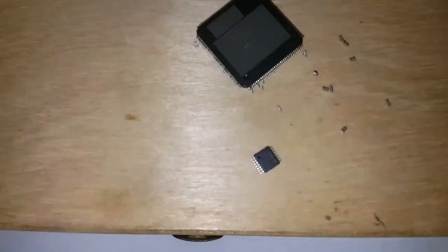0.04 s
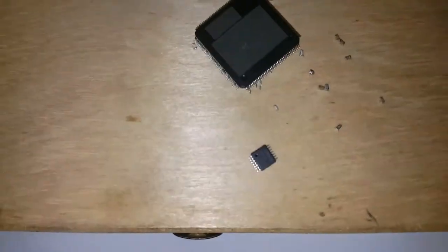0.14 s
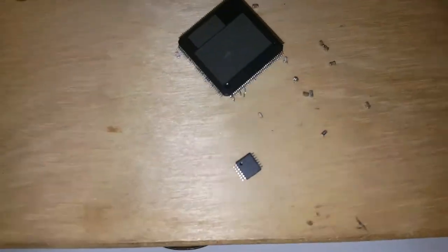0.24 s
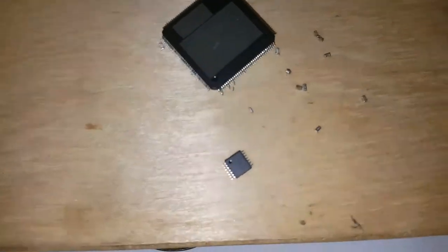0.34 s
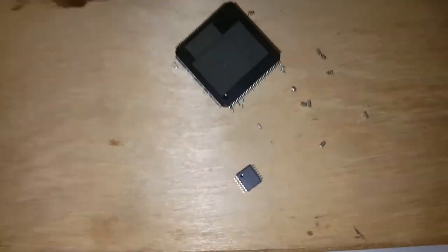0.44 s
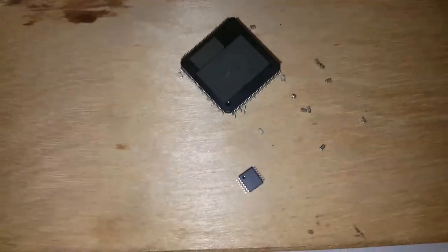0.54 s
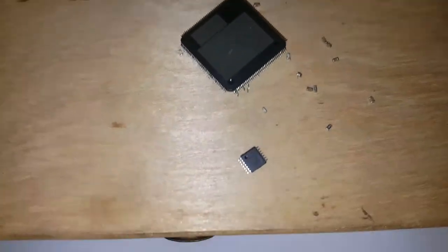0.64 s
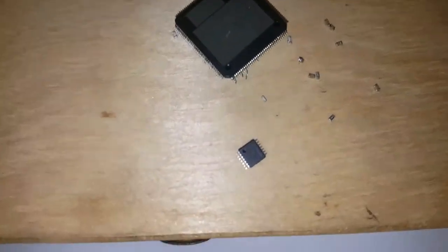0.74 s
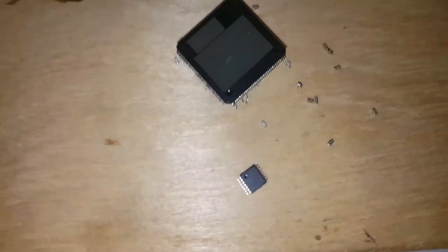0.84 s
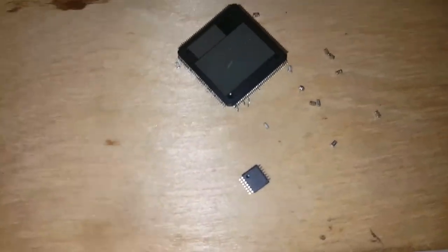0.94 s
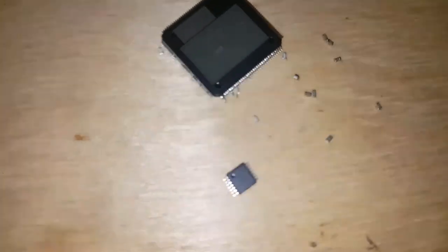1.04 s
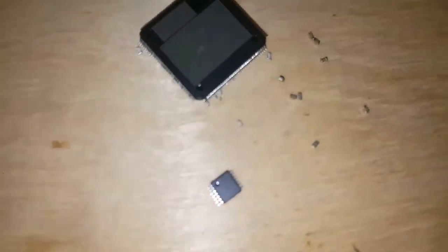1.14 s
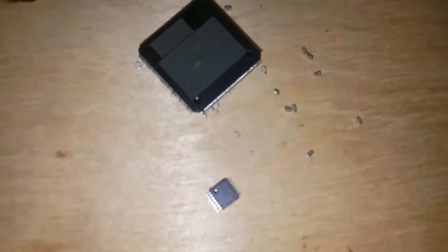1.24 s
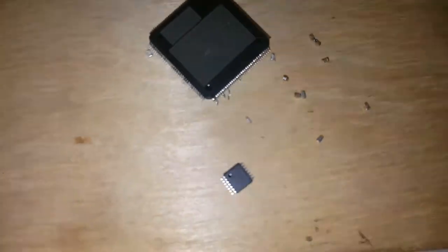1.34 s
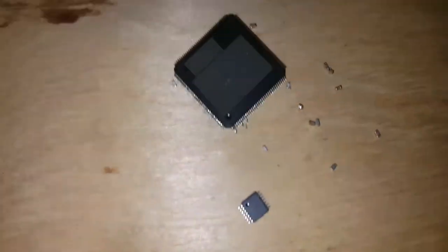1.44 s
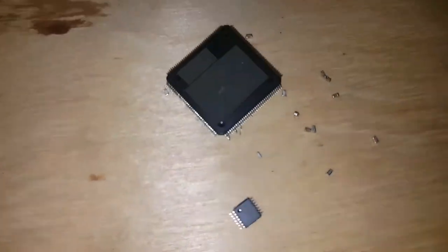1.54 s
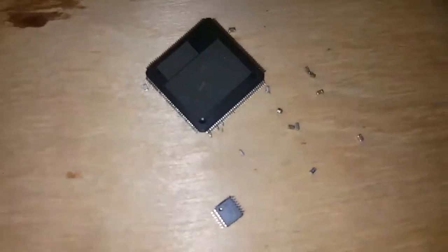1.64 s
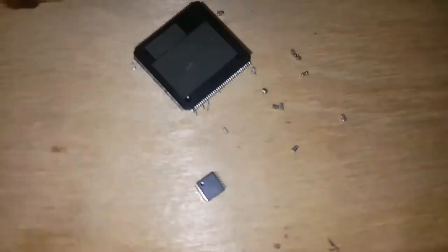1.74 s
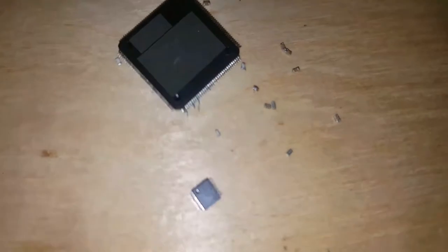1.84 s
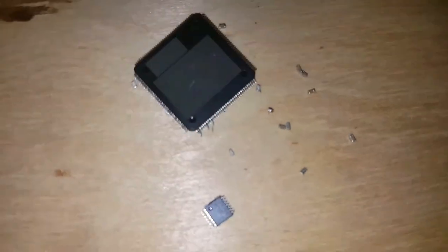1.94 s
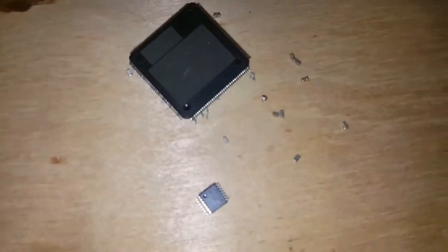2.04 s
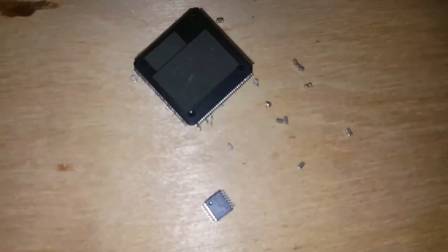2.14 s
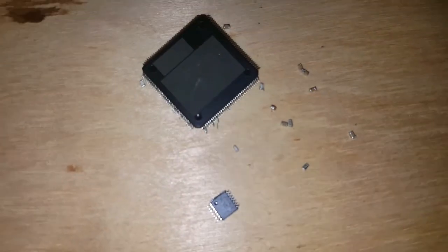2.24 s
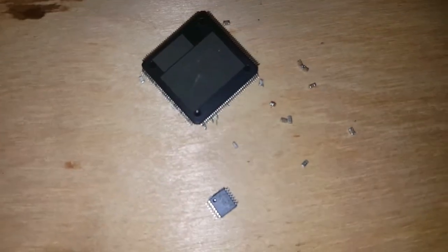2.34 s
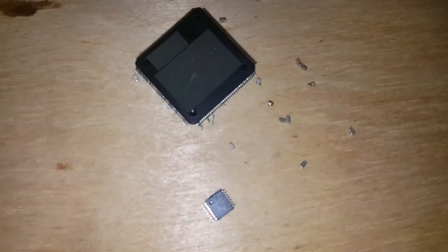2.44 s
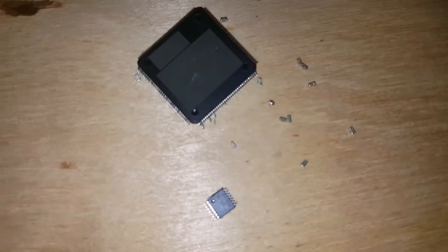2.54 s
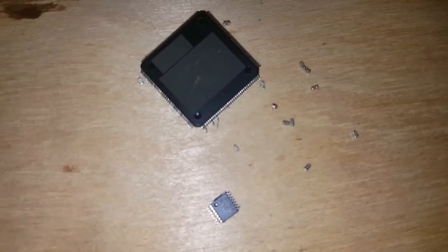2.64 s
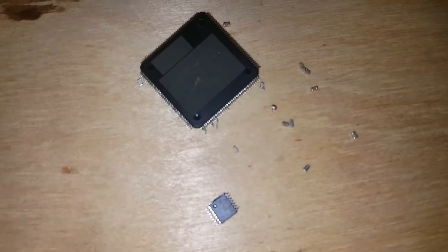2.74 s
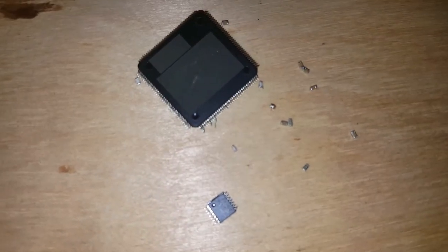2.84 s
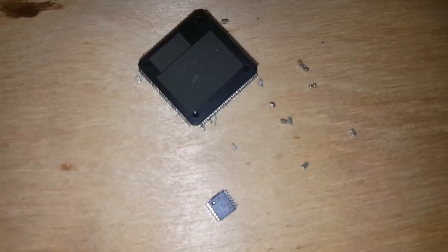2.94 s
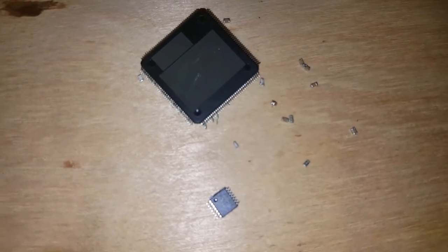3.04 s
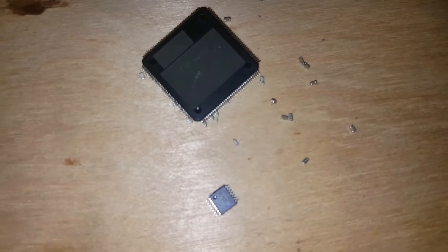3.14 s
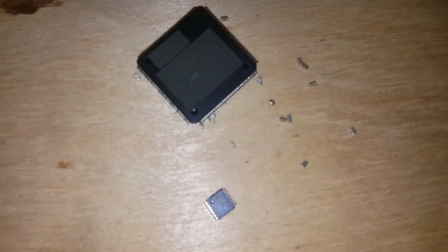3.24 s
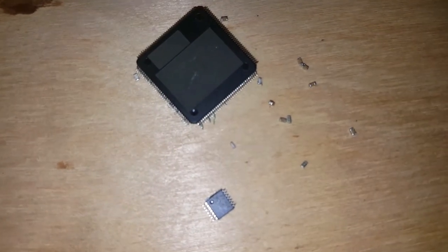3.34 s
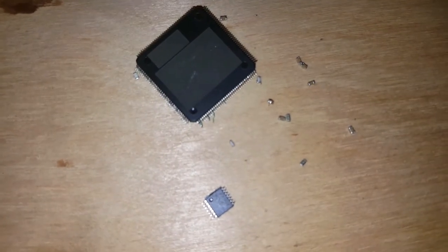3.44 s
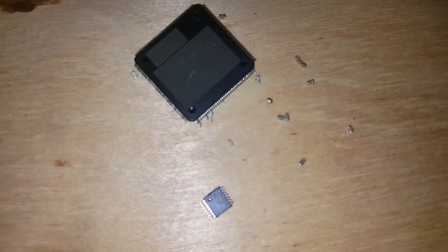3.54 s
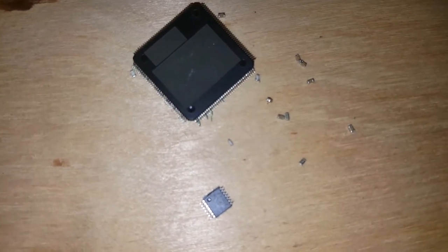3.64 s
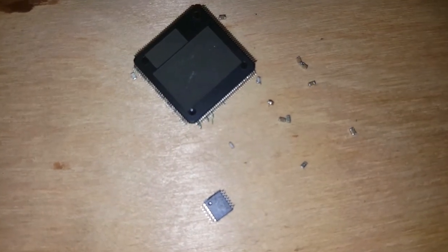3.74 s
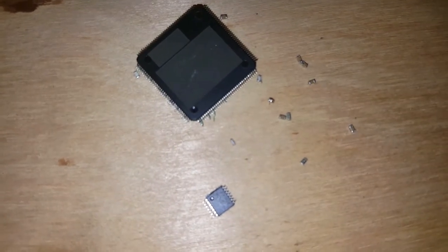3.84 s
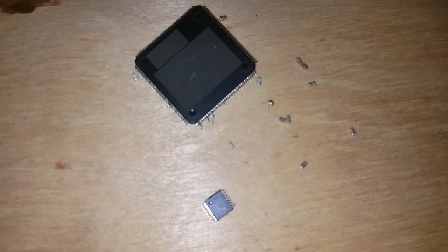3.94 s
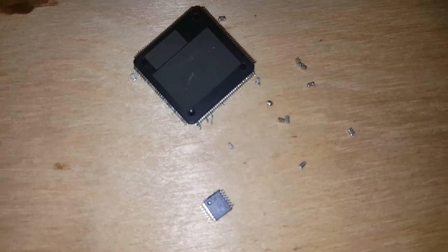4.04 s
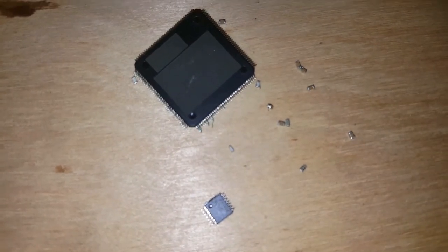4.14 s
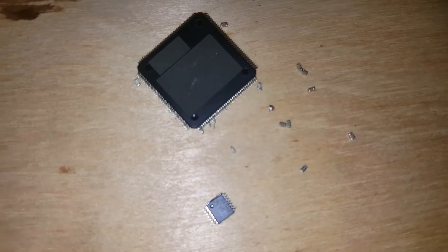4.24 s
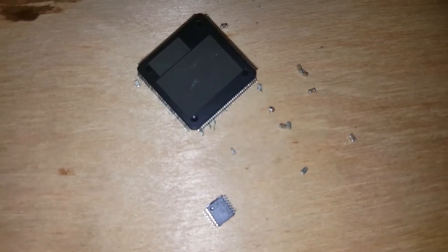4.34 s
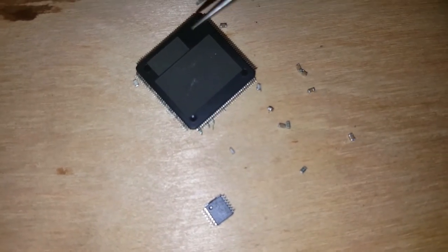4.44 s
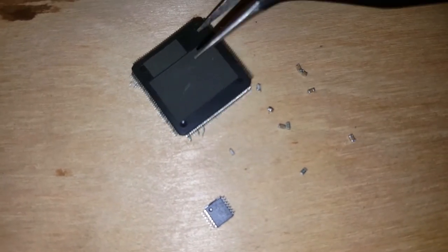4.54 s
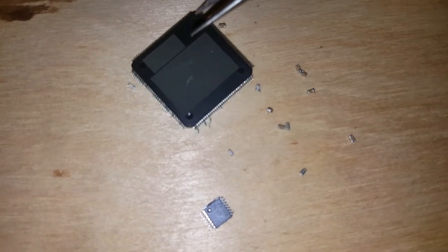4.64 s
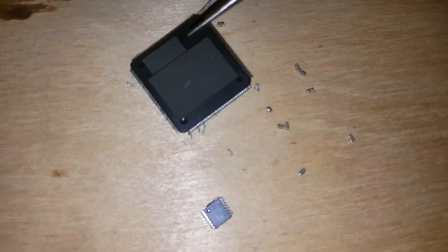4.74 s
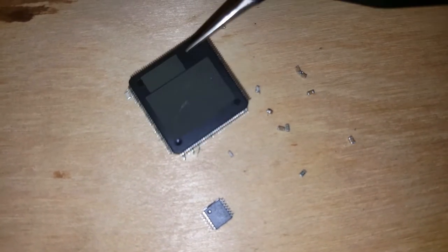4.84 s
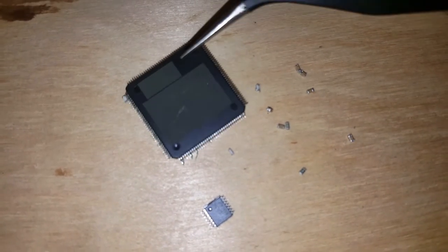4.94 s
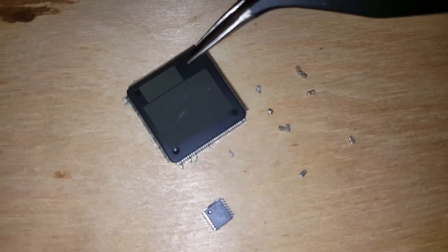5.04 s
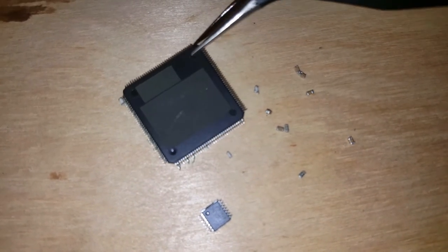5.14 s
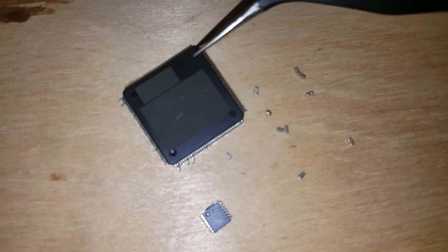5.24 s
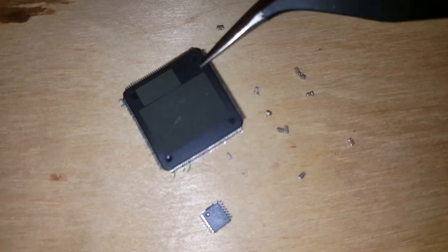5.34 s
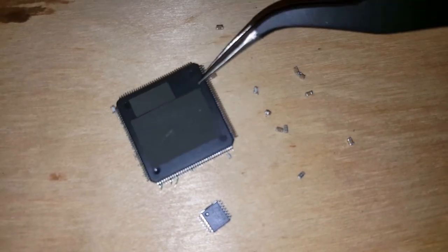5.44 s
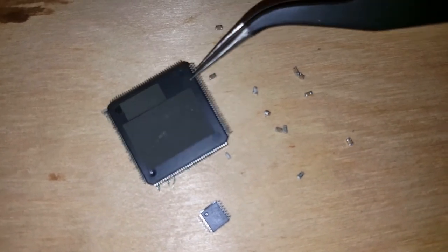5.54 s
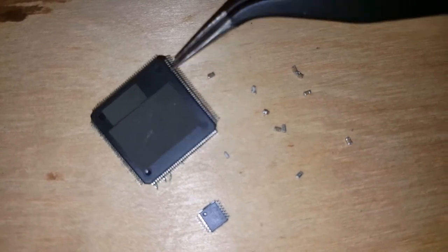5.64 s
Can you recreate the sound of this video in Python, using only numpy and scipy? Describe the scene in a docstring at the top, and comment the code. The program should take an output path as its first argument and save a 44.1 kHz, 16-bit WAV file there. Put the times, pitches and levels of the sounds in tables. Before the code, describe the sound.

Quiet small room, close stereo microphone on a hand-held camera. Fingers tap, rub and bump the camera body with low rumble for two seconds. Steel tweezers rattle brightly at 2.5 seconds, a sharp tap hits wood at 3.3, faint tip slides follow, then a cluster of clicks and gritty scrapes as a flat chip is dragged over the board.

```python
"""A quiet room with a wooden board: fingers tap and shift on a hand-held camera, then steel tweezers close by
are picked up with a rattle, tap the board, slide over it and drag a flat chip across the grain.
Taps are short bursts of noise plus fading tones. Rattle, slides and drags are uneven noise, shaped by
tone colours and by the resonances of steel, chip and board. The hand makes rumble, rubs and soft bumps.
Room tone and microphone hiss lie under it all; taps, rattle, slides and drags also get a short room tail."""
import sys
import numpy as np
from scipy import signal
from scipy.fft import rfft, irfft, next_fast_len
from scipy.io import wavfile
from scipy.ndimage import map_coordinates

SR = 44100
rng = np.random.default_rng(int(sys.argv[2]) if len(sys.argv) > 2 else 0)


def pcm_store(signal):
    """Save signal as 16-bit PCM."""
    levels = np.round(np.clip(np.atleast_2d(signal), -1, 1) * 32767)
    wavfile.write(sys.argv[1], SR, levels.astype(np.int16).T)


N = 251370

# Levels in the tables are relative: the functions below add their own trims.


def amp(db):
    """Decibels to gain."""
    return 10 ** (np.asarray(db) / 20)


def unit(x):
    """Scaled to rms 1."""
    return x / np.sqrt(np.mean(x ** 2) + 1e-20)


def sides(db):
    """Left and right gains for a level difference; positive is louder on the left."""
    return amp(np.array([db / 2, -db / 2]).reshape(2, -1))


def along(points):
    """(Hz, value) points joined on a log axis, as a function of frequency."""
    f, v = np.transpose(points)
    return lambda hz: np.interp(np.log(hz + 1), np.log(f + 1), v)


def colour(points):
    """Tone colour: gain at each frequency from (Hz, dB) points."""
    return lambda hz: amp(along(points)(hz))


def resonances(modes):
    """Sum of ringing (Hz, width Hz, dB) modes, every second one with its sign flipped."""
    def response(f):
        total = 0
        for k, (centre, width, db) in enumerate(modes):
            damping = 1j * f * width
            total = total + (-1) ** k * amp(db) * damping / (centre ** 2 - f ** 2 + damping)
        return total
    return response


def twice(modes):
    """Resonances applied twice, which leaves dark valleys between them."""
    once = resonances([(hz, 1.5 * width, db / 2) for hz, width, db in modes])
    return lambda f: once(f) ** 2


def filtered(x, response):
    """x shaped by a response of frequency."""
    m = next_fast_len(N + 8192)
    return irfft(rfft(x, m) * response(np.fft.rfftfreq(m, 1 / SR)), m)[..., :N]


def strokes(rows, rises, fades, pan_db):
    """Stereo gain curve for each level column: strokes rise, hold and fade over shares of their length."""
    t = np.arange(N) / SR
    out = np.zeros((len(rows[0]) - 2, N))
    for start, length, *levels_db in rows:
        corners = start + length * np.array([0, rises, 1 - fades, 1])
        at = slice(*np.searchsorted(t, corners[[0, 3]]))
        shape = np.sin(np.interp(t[at], corners, [0, 1, 1, 0]) * np.pi / 2) ** 2
        out[:, at] += amp(levels_db)[:, None] * shape
    return out[:, None] * sides(pan_db)


def grit(rate, rough_db, alike):
    """Stereo noise whose strength changes at random, rate times a second, with a slower drift on top."""
    knots = rng.standard_normal((2, int(N * rate / SR) + 4))
    fast = map_coordinates(knots[0], [np.arange(N) * rate / SR])
    slow = map_coordinates(knots[1], [np.arange(N) * rate / 5 / SR])
    a, b = rng.standard_normal((2, N))
    turn = np.arccos(alike) / 2  # mixing angle that makes left and right this much alike
    pair = np.array([np.cos(turn) * a + np.sin(turn) * b, np.cos(turn) * a - np.sin(turn) * b])
    return amp(rough_db * (fast + 1.33 * slow)) * pair


def slips(rate, size_db):
    """Gain of a rub that sticks and lets go: sudden bursts at chance moments, gone in a few ms."""
    chance, size = rng.random((2, N))
    bursts = (chance < rate / SR) * size * amp(size_db)
    fade = amp(-60 * np.arange(SR // 50) / SR / 0.0064)
    return unit(1 + signal.fftconvolve(bursts, fade)[:N])


def rubbed(gain, source, response):
    """Noise under a gain curve, ringing on through a response whose own loudness is evened out."""
    return filtered(gain * source, response) / np.std(filtered(source, response))


# tone colour of room and microphone: f/Hz, level/dB
HUSH_COLOUR = [(12, -35), (24, 2.5), (40, -21.5), (73, -5), (160, -4.5), (300, -8), (900, -11),
               (2100, -15.5), (4100, -20.5), (6200, -23.5), (7500, -21), (8400, -27.5), (10000, -30.5),
               (13000, -22.5), (14500, -25), (14700, -59)]
# how alike left and right are: f/Hz, likeness (0 to 1)
HUSH_LIKENESS = [(60, 0.1), (300, 0.41), (1400, 0.0042)]
# left-right balance: f/Hz, left minus right level/dB
HUSH_BALANCE = [(60, -2.5), (300, 1), (4400, 1), (8000, 0)]
HUSH_RMS_DB = -69


def hush():
    """Room tone and microphone hiss: steady noise, with a shared part and an opposed part in the two ears."""
    mid, side = rng.standard_normal((2, N))

    def turn(hz):
        return np.arccos(along(HUSH_LIKENESS)(hz)) / 2

    mid = filtered(mid, lambda hz: colour(HUSH_COLOUR)(hz) * np.cos(turn(hz)))
    side = filtered(side, lambda hz: colour(HUSH_COLOUR)(hz) * np.sin(turn(hz)))
    pair = np.array([mid + side, mid - side])
    pair = filtered(pair, lambda hz: sides(along(HUSH_BALANCE)(hz)))
    return amp(HUSH_RMS_DB) * unit(pair)


# the hand shifts its hold, a swell of rumble each time: t/s, peak level/dB
SHIFTS_OF_HOLD = [(0.0, -62), (.06, -62), (.32, -49), (.814, -65.5), (1.03, -56.5), (1.31, -67.5),
                  (1.47, -56), (1.76, -66), (1.87, -49.5), (2.525, -51), (3.286, -81), (3.845, -66),
                  (4.042, -65.5), (4.83, -77), (5.272, -74)]
SWELL_DB_PER_S, SETTLE_DB_PER_S = 375, 151
STILL_DB = -80  # rumble of a hand held still
# tone colour of that rumble: f/Hz, level/dB
RUMBLE_COLOUR = [(22, -33), (50, 0.5), (80, -1), (160, -4), (400, -23.5), (900, -63)]
# fingers rubbing the camera: t/s, length/s, thin level/dB, dull level/dB
FINGER_RUBS = [(.161, 0.11, -76, -53), (.27, 0.041, -80, -57), (.313, 0.059, -78, -54.5),
               (.523, 0.072, -76.5, -67), (.706, 0.044, -71.5, -70.5), (.803, 0.015, -73.5, -66),
               (.872, 0.088, -74.5, -75.5), (1.02, 0.043, -67.5, -62), (1.455, 0.12, -89, -62),
               (1.726, 0.024, -92, -59), (1.77, 0.034, -85, -60.5), (1.844, .15, -78.5, -50.5),
               (2.463, .05, -77, -50), (3.145, .028, -75, -89), (3.828, .08, -90, -62)]
# tone colour of the thin rub: f/Hz, level/dB
THIN_COLOUR = [(1500, -57), (4500, -12), (7200, 5), (9000, -9), (11000, -74)]
# tone colour of the dull rub: f/Hz, level/dB
DULL_COLOUR = [(100, -25), (300, 5), (700, -5.5), (1500, -21), (3200, -22.5), (6000, -39), (9000, -72.5)]
# bumps through the camera body: t/s, level/dB, f/Hz
BODY_BUMPS = [(.083, -48.5, 100), (.162, -39.5, 652), (.269, -33, 287), (.314, -33, 304),
              (.325, -35.5, 148), (.804, -54, 108), (1.025, -54.5, 276), (1.463, -50, 101),
              (1.479, -46.5, 202), (1.722, -52.5, 184), (1.77, -48.5, 248), (1.844, -35, 130),
              (1.857, -32.5, 154), (1.883, -29.5, 332), (1.907, -36.5, 210), (2.463, -49, 448),
              (2.523, -32.5, 121), (4.036, -53, 118), (4.792, -27, 250)]
BUMP_T60_S = 0.044  # time to fade by 60 dB
# the camera sways after a bump: t/s, level/dB, f/Hz, time to fade by 60 dB/s
CAMERA_SWAY = (1.885, -43, 82, .45)


def grip():
    """Fingers shift on the camera: rumble and fading low tones in its shell, strongest on the left, and rubs."""
    starts, peaks_db = np.transpose(SHIFTS_OF_HOLD)
    since = np.arange(N) / SR - starts[:, None]
    swells_db = peaks_db[:, None] + np.minimum(SWELL_DB_PER_S * since, -SETTLE_DB_PER_S * since)
    rumble = amp(STILL_DB) + amp(swells_db).sum(axis=0)
    out = sides(9.6) * rubbed(rumble, grit(14, rough_db=4.0, alike=0.58), colour(RUMBLE_COLOUR))

    thin, dull = strokes(FINGER_RUBS, rises=0.074, fades=0.82, pan_db=3)
    out += amp(3.0) * rubbed(thin, grit(110, rough_db=0.0, alike=0), colour(THIN_COLOUR))
    out += rubbed(dull, grit(120, rough_db=3, alike=0.37), colour(DULL_COLOUR))

    shell = np.zeros((2, N + SR))
    t = np.arange(SR // 2) / SR
    bumps = [(*bump, BUMP_T60_S) for bump in BODY_BUMPS]
    for start, db, hz, t60 in [*bumps, CAMERA_SWAY]:
        port_hz = hz * (1 + 0.047 * rng.standard_normal((2, 1)))  # pitch differs a little at each port
        push = amp(db - 60 * t / t60) * (1 - np.exp(-t / 0.0019))
        first = round(start * SR)
        shell[:, first:first + len(t)] += push * np.sin(2 * np.pi * port_hz * t)
    return out + sides(7.3) * shell[:, :N]


# fingers tap the camera, then tweezers tap the board: t/s, crack level/dB, treble level/dB against it,
# knock level/dB against it, knock f/Hz, left minus right level/dB
TAP_HITS = [(0.1604, -38.5, -0.5, -23, 665, -8.5), (.2684, -45.5, -27, -10, 840, -11),
            (0.3097, -52.5, -15, -5, 660, -16), (.3254, -58, -17, 2, 667, -5),
            (1.7714, -61.5, 2, -14, 660, -10), (1.8555, -52.5, -8, -10, 770, -13),
            (1.8786, -40.5, -10.5, -9, 764, -8.5), (1.919, -48.5, -2.5, -8, 600, 9.5),
            (2.5085, -33.5, 13, -14, 711, -3), (2.5267, -29, 7, -35, 1050, 0),
            (2.5364, -31.5, 17, -10, 664, 3), (2.5444, -35.5, 5, -5, 910, 2),
            (3.2764, -24, 1, 1.5, 1060, 5), (3.4206, -66, 8, -9, 830, -12), (4.0292, -62, 5, -2, 1140, 5),
            (4.5619, -43, -15, 7.5, 837, 11.5), (4.592, -39.5, -18, -9, 890, 6.5),
            (4.6146, -25.5, -9, -7.5, 857, 6), (4.6595, -35.5, -10, -6.5, 1060, 4),
            (4.6806, -31, -23, -19, 877, 8), (4.6908, -33, -19, -8, 995, 4),
            (4.7816, -42.5, -8, 0, 830, 12), (4.795, -31.5, -21, -7, 1110, 6.5),
            (4.8016, -38, -32, -2, 1084, 5), (4.8255, -38, -9, -9, 810, 5.5), (4.8867, -53, 5, -1, 885, 1),
            (5.002, -47.5, -13, -3.5, 900, 5), (5.0482, -47.5, -16, -10, 1330, 6.5),
            (5.512, -58, -14, 4, 900, 5), (5.59, -53, -8, -2, 750, 3), (5.629, -54, -3, 0, 980, 6)]
# tones of one knock: ratio to the knock's pitch, level/dB
KNOCK_TONES = [(.45, -7.5), (1.001, 1), (1.4, -8)]
# a tap's treble: f/Hz, width/Hz, level/dB
SNAP_MODES = [(6000, 1800, -11), (7330, 1010, 4)]
# a tap's very top: f/Hz, width/Hz, level/dB
TICK_MODES = [(12150, 2200, -1)]
CRACK_HZ, TAP_T60_S = 2450, .013
TICK_DB, TICK_FOLLOWS = -15, 0.17  # the top's drive, and how far it follows the treble column


def taps():
    """Each tap: a short crack of noise and a few cycles of the tapped camera or wood, different at each port."""
    crack, snap, tick, knock = np.zeros((4, 2, N + SR))
    t = np.arange(SR // 10) / SR
    band = np.tile(np.concatenate(signal.iirpeak(CRACK_HZ, 1.3, SR)), (2, 1))  # one resonance, twice
    for start, db, snap_db, knock_db, hz, pan_db in TAP_HITS:
        first = round(start * SR)
        at = slice(first, first + len(t))
        blow = sides(pan_db) * amp(db - 60 * t / TAP_T60_S) * (1 - np.exp(-t / 0.0006))
        noise = rng.standard_normal((3, 2, len(t)))
        crack[:, at] += signal.sosfilt(band, amp(9.5) * blow * noise[0])
        snap[:, at] += amp(snap_db + 10.5) * blow * noise[1]
        tick[:, at] += amp(TICK_DB + TICK_FOLLOWS * snap_db) * blow * noise[2]
        for ratio, level_db in KNOCK_TONES:
            tone_hz = ratio * hz * (1 + 0.037 * rng.standard_normal((2, 1)))
            swing = np.sin(2 * np.pi * tone_hz * t) * amp(12 * t / TAP_T60_S)  # knock outlasts the crack
            knock[:, at] -= amp(knock_db + level_db + 5.0) * blow * swing
    out = crack[:, :N] + filtered(snap[:, :N], twice(SNAP_MODES))
    out += filtered(tick[:, :N], twice(TICK_MODES))
    return out + filtered(knock[:, :N], resonances([(830, 3600, 0.0049)]))


# the two steel arms chattering: t/s, length/s, ring level/dB, clatter level/dB
ARM_RATTLE = [(2.509, 0.028, -36.5, -44), (2.527, 0.096, -31.5, -40.5)]
# ringing of the tweezers: f/Hz, width/Hz, level/dB
STEEL_MODES = [(3540, 44, -13), (3955, 55, -9), (5490, 110, -13), (5880, 120, -10), (6613, 29, 3.5),
               (7240, 36, -2.5), (7510, 40, -4.5), (7840, 45, -22.5), (8570, 23, -27), (9070, 115, -8.5),
               (9980, 60, -33), (10390, 83, -17), (11840, 110, -13.5), (12300, 200, -17), (12580, 35, -4),
               (13500, 15, -23), (13500, 60, -27), (14960, 120, -20)]
# the arms face the ports differently: f/Hz, left minus right level/dB
STEEL_BALANCE = [(3000, 4), (8000, -0.5), (11000, -2)]
# tone colour of the clatter: f/Hz, level/dB
CLATTER_COLOUR = [(88, -38), (150, -8), (575, -8.5), (917, -6), (1430, -11), (1710, -3.5), (3720, -7),
                  (6170, -5.5), (6940, -13.5), (8430, -4), (9290, -41), (11100, -41), (12700, 4),
                  (14800, -35), (15700, -50)]


def rattle():
    """The arms chatter against each other: quick contacts ring the steel over a broad clatter."""
    ring, clatter = strokes(ARM_RATTLE, rises=.04, fades=0.64, pan_db=-2)
    contacts = slips(191, size_db=-1) * grit(300, rough_db=0.0, alike=-0.21)

    def ringing(hz):
        return resonances(STEEL_MODES)(hz) * sides(along(STEEL_BALANCE)(hz))

    out = amp(1.0) * rubbed(ring, contacts, ringing)
    return out + amp(8.0) * rubbed(clatter, contacts, colour(CLATTER_COLOUR))


def damped_steel():
    """The lower steel modes, widened by the touch of fingers and wood."""
    return twice([(hz, 2.6 * width, db / 2) for hz, width, db in STEEL_MODES if hz < 8500])


# tweezer tips sliding on wood; the first row is the rattle dying away: t/s, length/s, hiss level/dB, body
# level/dB, board level/dB
TIP_SLIDES = [(2.6, 0.095, -57.5, -56, -64), (2.783, 0.094, -69.5, -78, -91), (2.903, .08, -74.5, -88, -95),
              (3.276, .092, -49.5, -54, -57), (3.809, 0.12, -65.5, -65.5, -80),
              (4.056, 0.071, -63, -65.5, -69.5), (4.192, 0.12, -63.5, -70, -67.5),
              (4.302, 0.054, -76, -92, -75), (4.345, 0.077, -66, -88, -65)]
# tone colour of grit under the tips: f/Hz, level/dB
GLIDE_COLOUR = [(1060, -38), (1800, -26), (2520, -2.5), (2980, -6.5), (3740, -1.5), (5510, 0), (5810, -4),
                (7310, 2.5), (9780, -34.5), (10200, -57), (12100, -12.5), (14300, -30), (14800, -41)]
# tone colour of wood under the tips: f/Hz, level/dB
BODY_COLOUR = [(250, -22), (550, -3), (1100, 3), (1500, -3), (2500, -6), (5000, -44)]
# ringing of the board, for slides and drags: f/Hz, width/Hz, level/dB
BOARD_MODES = [(222, 77, 2.5), (352.8, 26, 4.5)]


def slides():
    """The tips skate on wood: grit hisses and keeps the steel singing faintly, and wood and board answer."""
    hiss, body, board = strokes(TIP_SLIDES, rises=0.11, fades=0.36, pan_db=2.5)
    grain = grit(150, rough_db=1.5, alike=0)
    out = amp(-1.2) * rubbed(hiss, grain, colour(GLIDE_COLOUR))
    out += amp(-4) * rubbed(hiss, grain, damped_steel())
    out += rubbed(body, grit(80, rough_db=4.0, alike=0.089), colour(BODY_COLOUR))
    return out + rubbed(board, grit(90, rough_db=-3.0, alike=0.98), twice(BOARD_MODES))


# the chip dragged over the board: t/s, length/s, scrape level/dB, board level/dB, hiss level/dB
CHIP_DRAGS = [(4.561, 0.064, -45.5, -51.5, -51), (4.62, 0.043, -63, -59, -58),
              (4.659, 0.026, -54, -63, -57), (4.672, 0.048, -46.5, -54, -49.5),
              (4.781, 0.05, -47.5, -52.5, -48), (4.829, 0.16, -51.5, -51.5, -60.5),
              (4.997, .022, -50.5, -58, -68), (5.012, 0.055, -61.5, -60, -64),
              (5.144, 0.065, -65, -62, -73), (5.255, 0.044, -72, -58.5, -72),
              (5.301, 0.044, -68, -61.5, -70), (5.364, 0.13, -46.5, -48.5, -57.5),
              (5.489, 0.027, -52.5, -57, -73), (5.507, 0.043, -50.5, -59, -67.5),
              (5.572, 0.024, -50.5, -81.5, -88), (5.606, 0.062, -50, -88, -71.5),
              (5.686, .025, -58, -74, -71)]
# ringing of the chip on wood: f/Hz, width/Hz, level/dB
CHIP_MODES = [(800, 161, 15.5), (963, 34, 15.5), (1058, 97, -17), (1290, 120, -6.5), (1950, 210, -13.5),
              (2450, 75, -24), (3250, 150, -37)]
# tone colour of the broad part of the scrape: f/Hz, level/dB
RASP_COLOUR = [(350, -50), (700, -5.5), (1000, 8.5), (1500, 1), (2400, -13.5), (3300, -28), (5000, -48)]
# tone colour of grit under the chip: f/Hz, level/dB
HISS_COLOUR = [(1470, -10.5), (2500, -2.5), (2930, -11), (4360, -15), (5240, -7), (6010, -23), (7170, -2.5),
               (9010, -34), (10300, -57), (11500, -14.5), (12300, -13.5), (13700, -29), (15500, -63)]


def drags():
    """The chip's legs catch the grain: chip, board and tweezers resonate, grit hisses."""
    scrape, board, hiss = strokes(CHIP_DRAGS, rises=0.13, fades=0.49, pan_db=10)
    slipping = slips(240, size_db=1.0)
    catch = slipping * grit(200, rough_db=0.2, alike=0.36)
    grain = slipping * grit(230, rough_db=2.44, alike=-0.14)
    rasp = np.sqrt(scrape * hiss)  # harder strokes rasp more
    out = amp(-5.0) * rubbed(scrape, catch, twice(CHIP_MODES))
    out += amp(-0.5) * rubbed(rasp, catch, colour(RASP_COLOUR))
    out += sides(-5.0) * rubbed(board, grit(60, rough_db=1.0, alike=0.88), twice(BOARD_MODES))
    out += sides(-7.0) * amp(2.0) * rubbed(hiss, grain, colour(HISS_COLOUR))
    return out + sides(-10.0) * amp(-9.5) * rubbed(hiss, grain, damped_steel())


# tone colour of the room tail: f/Hz, level/dB
WALL_COLOUR = [(100, 8.5), (1100, -3), (2500, -1), (7000, -7.5), (10000, -16.5)]


def room(x):
    """A short dull tail from the walls: fading noise, unrelated at the two ports."""
    t = np.arange(SR // 2) / SR
    tail = rng.standard_normal((2, len(t))) * amp(-60 * t / 0.36)
    tail /= np.linalg.norm(tail[0])
    return filtered(signal.fftconvolve(x, tail, axes=1)[:, :N], colour(WALL_COLOUR))


def scene():
    """Taps, rattle, slides and drags get some room; the grip and the hush do not."""
    near = taps() + rattle() + slides() + drags()
    return near + amp(-11.5) * room(near) + grip() + hush()


# the microphone's treble loss: f/Hz, level/dB
MIC_COLOUR = [(20, 0), (14400, 1.5), (15000, -8), (15800, -29)]
TOP_HZ = 15865  # band limit


def record(dry):
    """The microphone fades at the top; nothing passes the band limit; the converter adds a small offset."""
    return filtered(dry, lambda hz: colour(MIC_COLOUR)(hz) * (hz < TOP_HZ)) - .00046


dry = scene()
out = record(dry)
pcm_store(out)
```